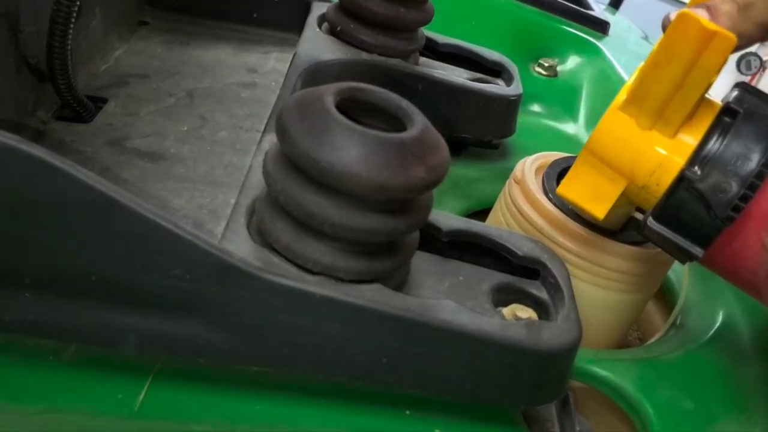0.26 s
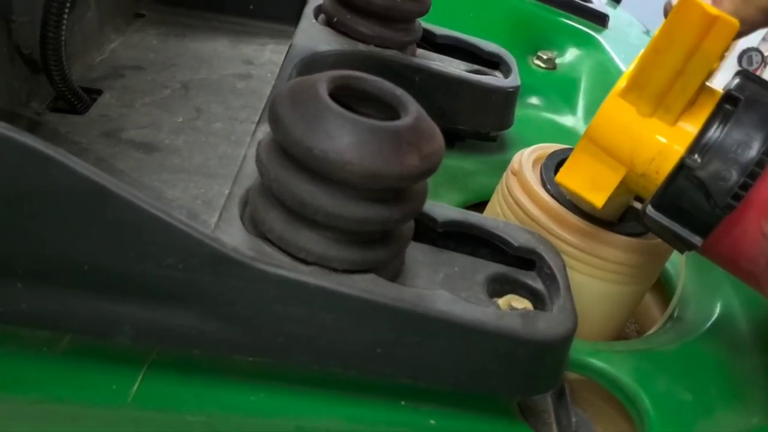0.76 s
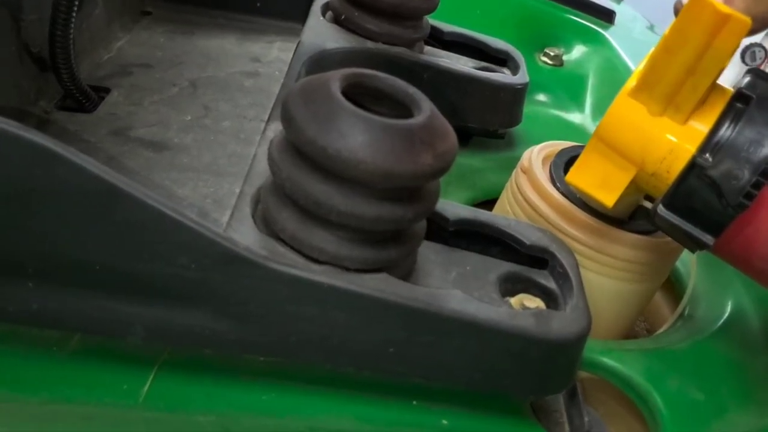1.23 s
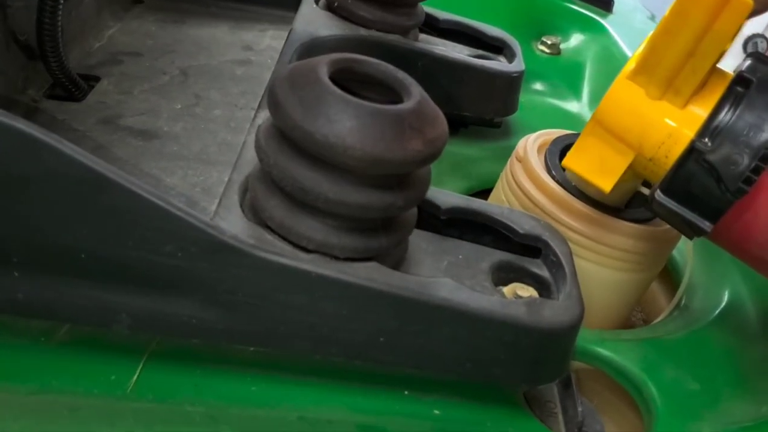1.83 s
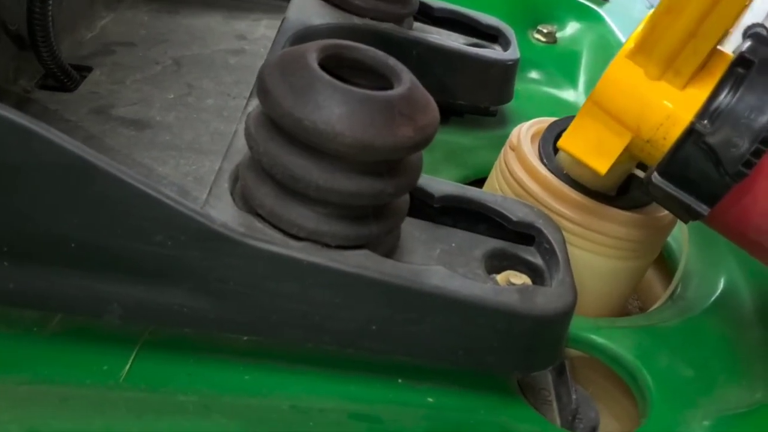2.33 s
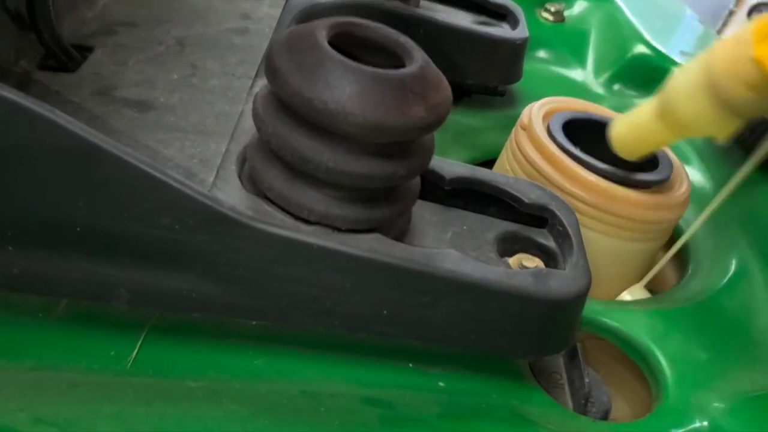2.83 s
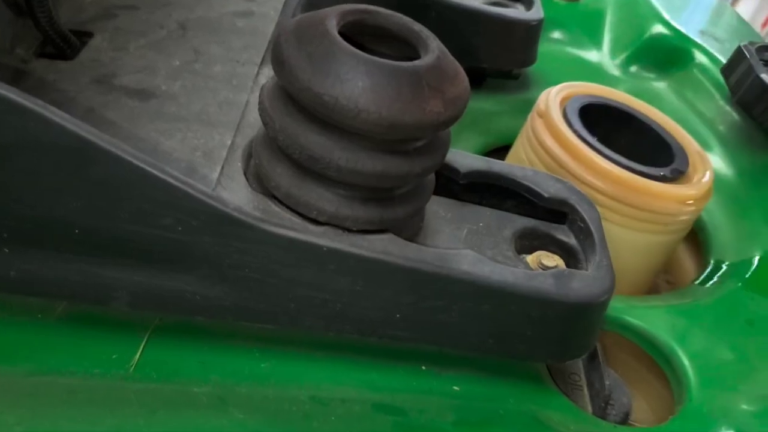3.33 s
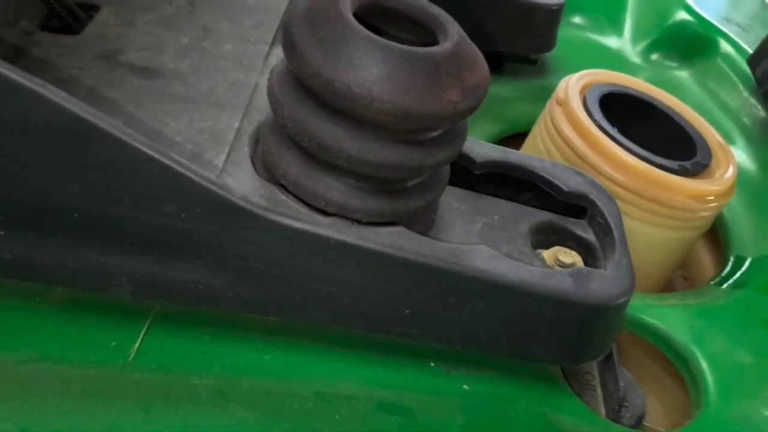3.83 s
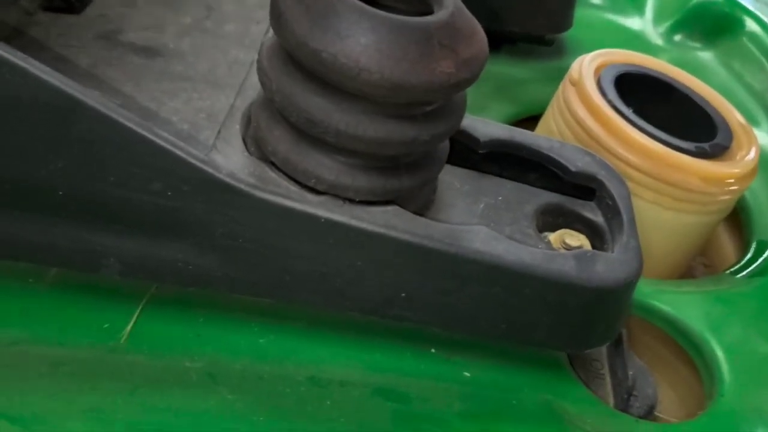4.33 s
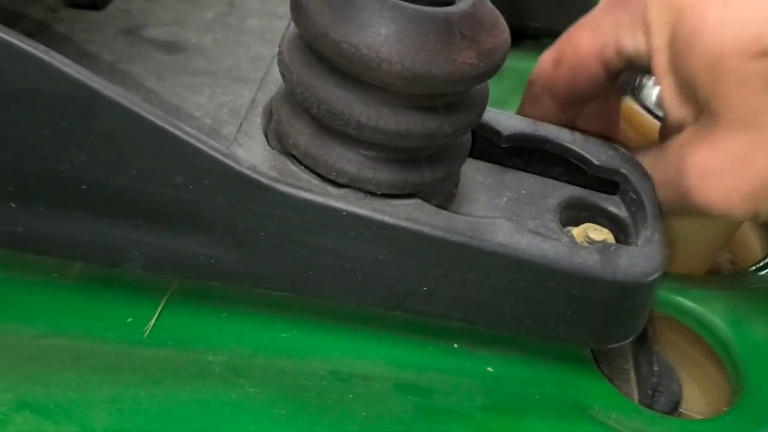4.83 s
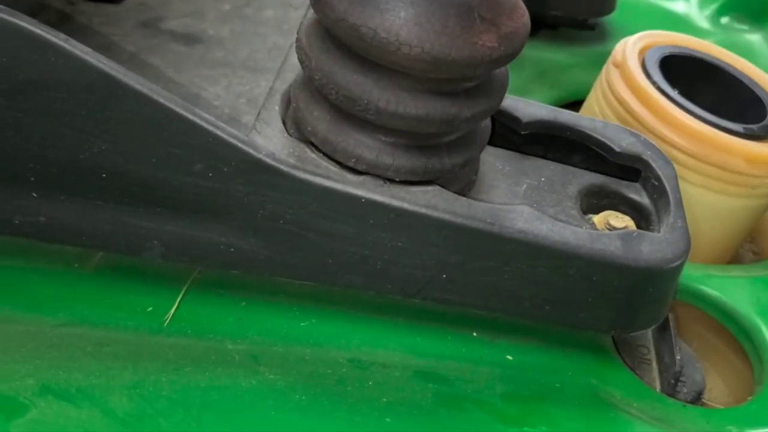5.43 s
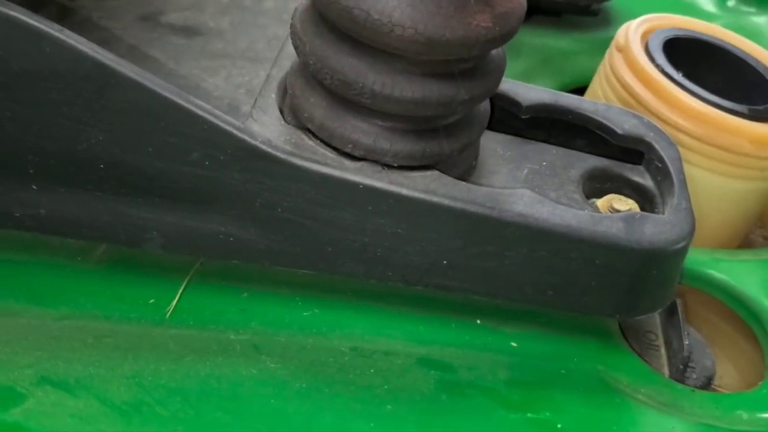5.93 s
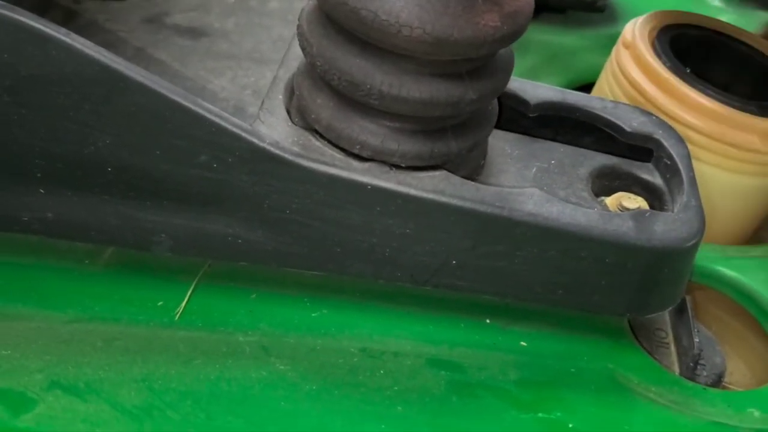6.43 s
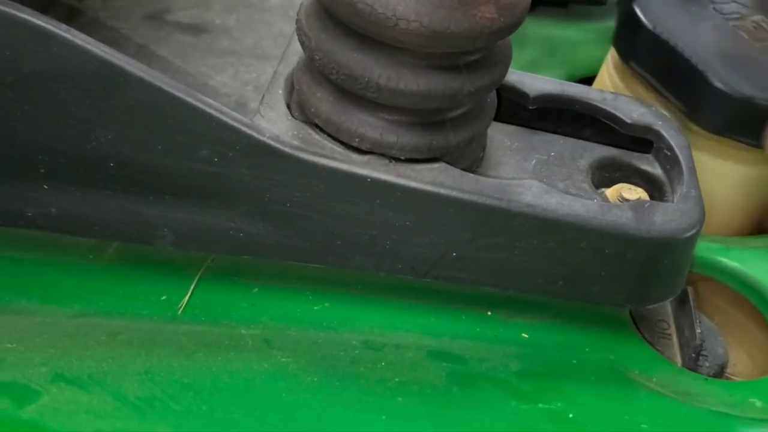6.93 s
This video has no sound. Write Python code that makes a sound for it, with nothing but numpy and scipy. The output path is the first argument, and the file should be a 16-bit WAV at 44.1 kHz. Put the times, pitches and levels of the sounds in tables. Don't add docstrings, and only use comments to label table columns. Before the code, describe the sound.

Fuel glugs and whistles softly through a spout, a valve snaps shut, a can booms down, then a plastic cap clicks and scrapes.

```python
import sys
import numpy as np
from scipy import signal
from scipy.fft import rfft, irfft, next_fast_len
from scipy.io import wavfile
from scipy.ndimage import map_coordinates

SR = 44100
rng = np.random.default_rng(int(sys.argv[2]) if len(sys.argv) > 2 else 0)


def dump_mix(stems):
    frames = np.atleast_2d(stems).T
    limited = np.clip(frames, -1, 1)
    pcm = np.round(limited * 32767).astype(np.int16)
    wavfile.write(sys.argv[1], SR, pcm)


def magnitude_from_level(level_db):
    exponent = np.asarray(level_db, float) / 20
    return 10 ** exponent


N = 316638
CLOCK = np.arange(N) / SR


def unit(x):
    return x / np.sqrt(np.mean(x ** 2) + 1e-20)


def along(points, hz):
    f, v = np.transpose(points)
    return np.interp(np.log(hz + 1), np.log(f + 1), v)


def wobble(rate):
    knots = rng.standard_normal(int(N * rate / SR) + 4)
    return map_coordinates(knots, [CLOCK * rate])


def filtered(x, response):
    n = x.shape[-1]
    m = next_fast_len(n + 4096, real=True)
    hz = np.fft.rfftfreq(m, 1 / SR)
    return irfft(rfft(x, m) * response(hz), m)[..., :n]


def peak(f, centre_hz, width_hz):
    return 1j * f * width_hz / (centre_hz ** 2 - f * f + 1j * f * width_hz)


def treble(f):
    return peak(f, 6060, 3500) ** 2 + 0.87 * peak(f, 12200, 8200) ** 2 / (1 + (f / 15700) ** 40)


def add(track, s, sound):
    part = track[..., round(s * SR):][..., :sound.shape[-1]]
    part += sound[..., :part.shape[-1]]


def spread(pair, alike, response=lambda hz: 1):
    def mix(hz):
        turn = np.arccos(np.clip(along(alike, hz), -1, 1)) / 2
        return response(hz) * np.array([np.cos(turn), np.sin(turn)])
    mid, side = filtered(pair, mix)
    return np.array([mid + side, mid - side])


def rush(colour, alike):
    noise = rng.standard_normal((2, N))
    return unit(spread(noise, alike, lambda f: magnitude_from_level(along(colour, f))))


def ports(x, lag_s):
    return filtered(x, lambda f: np.exp(-1j * np.pi * f * lag_s * np.array([[1], [-1]])))


# pitch in Hz, likeness from -1 to 1.
ALIKE = [(60, 1), (130, 0.92), (290, 0.74), (640, 0.01), (1410, -0.047), (3100, 0.053), (6820, -0.42),
         (15000, -0.48)]


def dying(seconds, t60s):
    hz, t, z = signal.stft(rng.standard_normal((2, round(seconds * SR))), SR, nperseg=512)
    fade = magnitude_from_level(-60 * t / along(t60s, hz)[:, None])
    return spread(signal.istft(z * fade, SR, nperseg=512)[1], ALIKE)


# pitch in Hz, level in dB per Hz.
SHOP = [(22, -12), (96, 1), (160, -16), (281, -3.5), (480, -15), (800, -24), (2200, -25), (3940, -37),
        (16000, -57)]


def shop_air():
    return magnitude_from_level(-50 + 1.9 * wobble(9.9)) * rush(SHOP, ALIKE)


# pitch in Hz, level in dB per Hz.
CHASSIS = [(20, -25), (40, -13), (80, 11), (120, -0.5), (200, -26.5), (400, -120)]
# start in seconds, level in dB.
ROCKS = [
    (2.339, -37),
    (3.1, -35),
    (3.96, -27.5),
    (6.55, -38.5),
]


def chassis_rocking():
    rise_s, t60_s = 0.041, 1.7
    rock = np.zeros(N)
    for s, db in ROCKS:
        age = CLOCK - s
        rock += magnitude_from_level(db - 60 * age / t60_s) * np.clip(age / rise_s, 0, 1)
    return magnitude_from_level(-4.5) * rock * rush(CHASSIS, ALIKE) * magnitude_from_level([[-.7], [.7]])


# pitch in Hz, time to fall 60 dB in seconds.
WALLS = [(100, 0.34), (1000, 0.21), (10000, 0.11)]


def walls(x):
    tail = dying(0.43, WALLS)
    delayed = np.pad(x, (400, 0))[None]
    return signal.fftconvolve(delayed, tail / np.linalg.norm(tail[0]), axes=1)[:, :N]


# pitch in Hz, level in dB per Hz.
BOOM = [(20, -12.5), (70, 2), (167, -6), (208, 0.5), (368, -7), (500, -8), (7510, -35.5), (16000, -75)]
# pitch in Hz, time to fall 60 dB in seconds.
BOOM_T60 = [(40, 1.44), (100, 1.35), (250, 0.68), (1000, 0.68), (4000, 0.42), (12000, 0.28)]


def boom():
    track = np.zeros((2, N))
    roll = unit(filtered(dying(1.2, BOOM_T60), lambda f: magnitude_from_level(along(BOOM, f))))
    t = np.arange(roll.shape[1]) / SR
    low = filtered(roll, lambda f: 1 / (1 + (f / 1500) ** 4))
    thud = low * (1 - np.exp(-t / 0.00068))
    slosh = (roll - low) * (1 - .9 * np.exp(-(t / .055) ** 2))
    add(track, 3.968, magnitude_from_level(-24) * (thud + magnitude_from_level(8) * slosh))
    return track


# start in seconds, peak level in dB, pitch in Hz,
# time to fall 60 dB in seconds, level of the shell ring in dB.
KNOCKS = [(2.362, -10, 106, 0.14, -1.5), (2.577, -33, 280, .12, -12), (2.598, -33, 100, .12, -20),
          (2.759, -28.5, 303, 0.22, -1.5), (2.765, -33, 95, .25, -20), (2.921, -29, 108, 0.2, 5.5),
          (2.996, -20, 345, 0.2, -1.5), (3.03, -27, 100, .3, -15), (3.085, -30, 350, .12, -5),
          (3.191, -15, 300, 0.3, 2), (3.215, -24.5, 132.8, 0.38, -8), (3.471, -38, 81.7, 0.31, 9.5),
          (3.971, -13, 250, 0.14, 0), (4.739, -36, 197, 0.41, 11), (4.968, -30.5, 422, 0.38, 13.5),
          (5.008, -30, 364, 0.33, 13.5), (5.943, -36, 314, 0.15, 5), (6.413, -23, 400, 0.26, 5),
          (6.548, -21.5, 303, 0.14, 6), (6.567, -15, 240, 0.079, -37), (6.66, -26.5, 125, 0.38, -15),
          (6.878, -30, 247, 0.071, 0), (6.977, -20.5, 256, 0.082, 0.5), (6.985, -30, 100, .3, -20),
          (7.139, -28, 180, 0.14, -25)]


def hollow_thumps():
    track, t = np.zeros(N), np.arange(SR // 3) / SR
    for s, db, hz, t60, shell_db in KNOCKS:
        burst = rng.standard_normal(len(t)) * magnitude_from_level(-60 * t / t60) * (1 - np.exp(-t / 0.0018))
        low = filtered(burst, lambda f: peak(f, hz, hz / 3) + .4 * peak(f, 220, 300) ** 2)
        shell = filtered(burst * magnitude_from_level(-60 * t / 0.037), lambda f: peak(f, 815, 700) ** 2)
        both = low / abs(low).max() + magnitude_from_level(shell_db) * shell / abs(shell).max()
        add(track, s, magnitude_from_level(db + 2) * both)
    return track


# start in seconds, level in dB, pitch in Hz, time to fall 60 dB in seconds.
RINGS = [(2.385, -29, 535, 0.4), (2.366, -11, 140, 0.25), (2.372, -17, 228, 0.3), (2.998, -16, 370, 0.15),
         (3.028, -19, 345, .15), (3.0, -24, 830, .12), (2.362, -20, 760, .06), (2.805, -38, 835, .12),
         (2.925, -30, 100, .2), (4.035, -22, 362, .15), (4.02, -21, 205, .2), (4.04, -30, 535, .2),
         (3.195, -19, 245, .12), (3.235, -23, 345, .2), (5.96, -46, 318, .4), (6.425, -26, 310, .25),
         (3.972, -11, 257, .2), (3.972, -18, 190, .15), (3.214, -24, 42, 0.35), (3.976, -22, 75.2, 1.6),
         (3.974, -30, 62, 1.2), (3.978, -28, 90.8, .8), (6.085, -39.5, 320, 0.55), (6.06, -46, 530, .2),
         (6.568, -19, 115.4, 0.24), (6.57, -22, 255, .15), (6.98, -30, 105, .3)]


def ringing_panels():
    track, t = np.zeros(N), np.arange(SR) / SR
    wander = wobble(25)
    rise_cycles, blur = 3.5, .25
    for s, db, hz, t60 in RINGS:
        waver = blur * hz / 300 * np.roll(wander, round(hz) * 100)[:SR]
        swell = 1 - np.exp(-t * hz / rise_cycles)
        add(track, s, magnitude_from_level(db - 60 * t / t60) * swell * np.sin(2 * np.pi * hz * t + waver))
    return track


def rubbing(table, width, broad, rise_s, order, modes):
    body, edge = np.zeros((2, 2, N))
    for s, t60, db, hz, treble_db in table:
        rise = min(rise_s + .06 * t60, 0.2)
        length_s = min(rise + 0.88 * t60, N / SR - s + rise)
        t = np.arange(int(length_s * SR)) / SR
        pair = rng.standard_normal((2, len(t)))
        shape = magnitude_from_level(db - 60 * np.maximum(t - rise, 0) / t60) * np.minimum(t / rise, 1) ** 0.6
        rub = filtered(pair, lambda f: peak(f, hz, width * hz) ** order + broad * peak(f, 2300, 4100) ** 2)
        add(body, s - rise, shape * unit(rub))
        add(edge, s - rise, shape * magnitude_from_level(treble_db + 2.5) * pair)

    def comb(f):
        return 1 + 2.0 * sum(magnitude_from_level(g) * peak(f, c, w) for c, w, g in modes)
    grit = magnitude_from_level(2.2 * wobble(300) + 1.8 * wobble(67))
    dull = spread(body, ALIKE, comb) * magnitude_from_level(-3.5 if modes else 0)
    return (dull + spread(edge, ALIKE, treble)) * unit(grit)


# peak time in seconds, time to fall 60 dB in seconds,
# level in dB, pitch in Hz.
CHIMES = [(2.364, 0.04, -16, 1140), (2.995, 0.03, -15.5, 3280), (2.997, 0.026, -33, 4760),
          (4.44, 0.14, -57, 7050), (4.778, .07, -37.5, 6030), (6.227, 0.42, -57, 2960),
          (4.969, 0.045, -22, 6160), (5.116, 0.3, -40, 3080), (5.12, 0.37, -48, 5180),
          (5.165, .03, -19, 4700), (5.832, .12, -30, 1740), (5.83, 0.045, -23.5, 4700),
          (5.84, .4, -47, 4900), (5.945, 0.22, -47, 4930), (6.232, 0.14, -57, 5000), (6.54, 0.3, -37, 5100),
          (6.979, 0.11, -37, 820)]


def chimes():
    rows = [(*row, -37) for row in CHIMES]
    return rubbing(rows, width=.12, broad=.01, rise_s=.0015, order=2, modes=[])


# peak time in seconds, time to fall 60 dB in seconds, level in dB,
# pitch in Hz, treble level in dB.
SPOUT_STROKES = [(2.359, 0.054, -25, 1110, -31.5), (2.72, 1.5, -54, 2500, -5), (3.0, 1.45, -47.5, 2980, -8),
                 (3.207, 0.17, -18, 2280, -20), (3.281, 0.71, -42, 2150, -23), (3.48, 0.19, -57, 948, -2.5),
                 (3.966, 0.13, -34.5, 1200, -31), (4.045, 0.48, -44.5, 6360, -10.5)]
# peak time in seconds, time to fall 60 dB in seconds,
# level in dB, pitch in Hz, treble level in dB.
CAP_STROKES = [(4.745, .25, -51.5, 766, -22), (4.782, 0.09, -32, 2930, -12), (4.809, .25, -36, 2170, -27),
               (4.98, 0.08, -21.5, 2750, -18.5), (5.035, 0.4, -27, 1900, -25),
               (5.124, 0.45, -48.5, 3040, -18), (5.176, 0.06, -26.5, 3380, -16.5),
               (5.236, 0.14, -27, 3330, -38), (5.262, 0.12, -33, 860, -20), (5.225, .15, -40, 850, -30),
               (5.195, .2, -42, 2000, -20), (5.09, .3, -42, 880, -30), (5.85, 0.4, -41, 1900, -8),
               (5.949, 0.48, -41, 2040, -23), (6.232, .15, -46, 1500, -12), (6.26, .6, -42, 750, -19),
               (6.075, .3, -48, 650, -35), (6.32, .3, -50, 2600, -15), (6.72, .15, -45, 850, -20),
               (6.43, 0.25, -21, 1900, -17), (6.44, .22, -22, 1050, -30), (4.955, .2, -40, 1800, -35),
               (4.81, .3, -41, 1200, -30), (6.39, 0.2, -43.5, 3010, -2.5), (6.563, 0.049, -35, 1200, -5),
               (6.701, 0.34, -45.5, 1020, -15), (6.88, 0.08, -51, 1500, -25), (6.993, 0.14, -42, 1230, -21),
               (7.05, 2, -51, 1350, 2), (5.99, 27, -68, 4900, -8)]
# pitch in Hz, width in Hz, level in dB.
CAP = [(840, 110, -2), (1780, 70, -2), (2280, 60, -3), (2600, 80, -6), (3050, 140, -3), (3580, 90, -2),
       (3910, 170, -6), (4480, 130, -6), (5050, 130, -5), (5910, 130, -12), (6500, 80, -12)]


def strokes():
    return rubbing(SPOUT_STROKES + CAP_STROKES, width=0.33, broad=0.35, rise_s=.009, order=1, modes=CAP)


def clicks(table, sharp, tail_db):
    track, t = np.zeros(N), np.arange(SR // 12) / SR
    for s, db, hz, treble_db, t60 in table:
        noise = rng.standard_normal(len(t)) * (1 - np.exp(-t / 0.001))
        snap = 5 * np.exp(-((t - .0004) / .00004) ** 2)
        crack = 0.92 * noise * magnitude_from_level(-60 * t / 0.013) + snap
        rattle = noise * magnitude_from_level(tail_db - 60 * t / t60)
        body = filtered(crack, lambda f: peak(f, hz, hz / sharp) + 0.066 * peak(f, 2000, 4200))
        body += filtered(rattle, lambda f: 1.1 * peak(f, hz, hz / 3.55) ** 2)
        edge = filtered(crack + rattle, treble)
        both = body / abs(body).max() + magnitude_from_level(treble_db + 5.5) * edge / abs(edge).max()
        add(track, s, magnitude_from_level(db + 3.5) * both)
    return track


# start in seconds, peak level in dB, pitch in Hz, treble level in dB.
SPOUT_TICKS = [(2.3425, -30.5, 2140, -25), (2.3602, -19.5, 1500, 7.5), (2.3636, -14, 1150, -6),
               (2.743, -31, 3040, -19.5), (2.759, -33, 5730, 4), (2.8377, -31.5, 6330, -12),
               (2.8532, -32.5, 2640, -9.5), (2.855, -40, 1150, -30), (2.805, -40, 840, -30),
               (2.921, -28, 3300, -17.5), (2.922, -32, 980, -30), (2.9941, -12, 3196, -27.5),
               (3.019, -23, 3460, -5), (3.088, -40, 3320, -17), (3.183, -32, 2500, -8),
               (3.1903, -12.5, 3100, -2), (3.1969, 0, 2150, -29.5), (3.212, -15, 1980, -38),
               (3.243, -18.5, 2100, -31), (3.301, -26, 2360, -36), (3.469, -41.5, 1210, -21),
               (3.948, -29, 1210, -40)]
# start in seconds, peak level in dB, pitch in Hz, treble level in dB.
CAP_TICKS = [(4.7367, -50, 2390, -24), (4.774, -39.5, 3080, -19.5), (4.8044, -16.5, 2690, -30),
             (4.9432, -30, 2000, -40), (4.9679, -10.5, 2780, -30.5), (5.009, -15.5, 2980, -26),
             (5.1053, -38, 2950, -22.5), (5.1641, -16, 3260, -25), (5.214, -26, 3150, -35),
             (5.2358, -27, 3760, -25), (5.255, -32, 2450, -25), (5.012, -28, 4700, -25),
             (5.095, -35, 3100, -25), (5.035, -27, 2900, -30), (5.067, -30, 2300, -30),
             (5.8295, -17, 1600, -12), (5.828, -23, 2600, -30), (5.9414, -26, 2700, -25),
             (5.943, -31, 1130, -35), (5.945, -24, 2100, -35), (6.101, -49, 6000, -5),
             (6.223, -36, 5230, -27.5), (6.4156, -7, 1800, -14), (6.5284, -33, 5170, -8),
             (6.548, -11.5, 1800, -34.5), (6.6813, -38, 1550, -23), (6.775, -44, 2930, -3.5),
             (6.8728, -31, 1570, -30), (6.977, -18, 1235, -18), (6.978, -21, 780, -35),
             (6.9785, -23, 2450, -25), (6.976, -25, 1800, -30), (7.1417, -53, 2800, -9)]


def contacts():
    rows = [(*row, .019) for row in SPOUT_TICKS]
    rows += [(*row, .055) for row in CAP_TICKS]
    return clicks(rows, sharp=12, tail_db=-3.0)


# pitch in Hz, width in Hz, level in dB.
NECK = [(843.6, 22, -3), (1880, 120, -17), (2940, 45, -14), (4560, 180, -43), (5170, 36, -44),
        (7030, 360, -31)]
# start in seconds, peak level in dB.
GULPS = [(0.03, -44), (0.188, -43.5), (0.252, -55), (0.324, -45), (0.487, -44.5), (0.682, -47), (0.76, -39),
         (0.887, -38), (1.0, -41.5), (1.09, -41), (1.245, -38.5), (1.322, -43), (1.472, -42.5),
         (1.584, -39), (1.698, -44.5), (1.834, -38), (2.109, -39), (2.224, -46.5)]


def neck_whistle(flow_db):
    gulps, track = np.zeros(N), np.zeros(N)
    for s, db in GULPS:
        add(gulps, s - .006, magnitude_from_level(db + 3) * np.hanning(int(.048 * SR)))
    for k, (hz, width_hz, db) in enumerate(NECK):
        flutter = magnitude_from_level((4.5 if k else 3) * wobble(30))
        drive = magnitude_from_level(flow_db + 7) * flutter + gulps * 0.38
        tone = unit(filtered(rng.standard_normal(N), lambda f: peak(f, hz, width_hz)))
        track += magnitude_from_level(db) * np.sqrt(width_hz / 30) * drive * tone
    song = np.sin(2 * np.pi * NECK[0][0] * CLOCK + 0.98 * wobble(40))
    return track + magnitude_from_level(-4) * gulps * song


def bubbles(count, centre_hz, low_hz):
    track, draw = np.zeros(N), rng.standard_normal((count, 3))
    starts = np.linspace(0, 2.36, count) + 0.014 * draw[:, 0] ** 2
    for s, (_, b, c) in zip(starts, draw):
        hz = np.clip(centre_hz * np.exp(0.416 * b), low_hz, 2800)
        v = np.arange(int(9 * SR / hz)) * hz / (9 * SR)
        size = magnitude_from_level(3.2 * c) * np.sqrt(900 / max(hz, 900))
        swell = np.sin(np.pi * np.sqrt(v)) ** 2
        add(track, s, size * swell * np.sin(2 * np.pi * 9 * v * (1 + 0.18 * v)))
    return unit(track)


# start in seconds, peak level in dB, pitch in Hz, treble level in dB.
SPITS = [(0.171, -38, 1830, -9), (0.332, -26, 990, -24.5), (0.3927, -47.5, 2940, 6),
         (0.5147, -34.5, 2480, -33), (0.6028, -36.5, 2740, -11), (1.121, -31.5, 1680, -25),
         (1.3537, -37.5, 2940, -6.5), (1.602, -45, 1820, -0.5), (1.6832, -33, 4900, -26),
         (1.833, -28, 990, -22), (2.2285, -32, 1900, -15.5), (2.224, -33, 920, -25), (.805, -38, 1860, -25),
         (1.006, -35, 1870, -20), (.83, -38, 990, -30), (.905, -40, 2300, -10), (.415, -41, 1950, -15),
         (2.282, -27, 932, -20.5)]


def splashes():
    return clicks([(*row, .02) for row in SPITS], sharp=12.0, tail_db=4.5)


# start in seconds, peak level in dB, pitch in Hz.
GLUGS = [(0.155, -25, 265), (0.336, -32, 256), (0.45, -32.5, 174), (0.538, -31, 230), (0.607, -22.5, 271),
         (0.665, -27.5, 277), (0.766, -29.5, 278), (0.803, -29, 307), (0.963, -22.5, 293),
         (1.005, -29, 287), (1.114, -37.5, 172), (1.276, -35, 286), (1.354, -33, 189), (1.78, -36, 259),
         (1.849, -32, 273), (1.946, -33, 276), (2.105, -33.5, 292), (2.224, -32, 250), (2.284, -24, 287)]


def big_glugs():
    track, cycles = np.zeros(N), 5.64
    for s, db, hz in GLUGS:
        v = np.arange(int(cycles * SR / hz)) * hz / (cycles * SR)
        swell = np.sin(np.pi * v ** 0.76) ** 2
        tone = np.sin(2 * np.pi * cycles * v * (0.95 + 0.07 * v))
        add(track, s - .004, magnitude_from_level(db - 1.5) * swell * tone)
    return track


# pitch in Hz, level in dB per Hz.
GURGLE = [(53, -41), (90, 4.5), (299, 2.5), (346, -5.5), (387, 1), (492, -17), (910, -62), (1540, -120)]
# pitch in Hz, level in dB per Hz.
SPRAY = [(350, -21.5), (800, 1), (1400, -10), (4230, -17), (6960, -13.5), (9330, -27.5), (14900, -20.5),
         (16500, -54)]
# pitch in Hz, likeness from -1 to 1.
ALIKE_POUR = [(60, -0.49), (130, 0.82), (290, 0.76), (640, -0.75), (1410, -0.025), (3100, 0.13),
              (6820, -0.34), (15000, 1)]


def gurgle_and_spray(gurgle_db, spray_db):
    lumps = wobble(30)
    uneven = magnitude_from_level(3.2 * np.tanh(lumps / 2) * 2)
    gurgle = magnitude_from_level(gurgle_db + 1.5) * unit(uneven * rush(GURGLE, ALIKE_POUR))
    flicker = magnitude_from_level(3.3 * wobble(90) + 0.33 * lumps)
    return gurgle + magnitude_from_level(spray_db - 3.5) * unit(flicker * rush(SPRAY, ALIKE_POUR))


# time in seconds, flow in dB.
FLOW = [
    (0.0, 0.5),
    (1.2, -3),
    (2.78, -4),
]


def pour():
    flow_db = np.interp(CLOCK, *np.transpose(FLOW))
    gurgle_db, neck_db, spray_db = -44.5 + flow_db, -53.5 + 1.22 * flow_db, -46.5 + 0.16 * flow_db
    flowing = np.clip((2.95 - CLOCK) / 0.086, 0, 1)
    fizz = magnitude_from_level(spray_db - 7.5) * bubbles(count=420, centre_hz=1118, low_hz=500)
    fizz += magnitude_from_level(gurgle_db - 7) * bubbles(count=110, centre_hz=250, low_hz=150)
    whistle = neck_whistle(neck_db - 12 * (CLOCK > 2.36))
    near = ports(whistle, lag_s=0.00011) + ports(fizz + splashes(), lag_s=0.00032)
    stream = flowing * (gurgle_and_spray(gurgle_db, spray_db) + near)
    return stream + ports(big_glugs(), lag_s=0.00031)


def scene():
    ticks, thumps = contacts(), hollow_thumps() + ringing_panels()
    hands = ports(ticks, lag_s=0.0002564) * magnitude_from_level([[1.2], [-1.2]]) + magnitude_from_level(-15.5) * walls(ticks)
    hands += strokes() + chimes()
    body = ports(thumps, lag_s=0.00037) * magnitude_from_level([[-.7], [.7]]) + magnitude_from_level(-7) * walls(thumps)
    return shop_air() + chassis_rocking() + boom() + body + hands + pour()


def low_pass(x):
    return signal.sosfilt(signal.butter(12, 16810, fs=SR, output="sos"), x)


# pitch in Hz, level in dB per Hz.
HISS = [(3000, -38), (6000, -16.5), (10000, -0.5), (16000, 4)]


def record(dry):
    wet = dry + magnitude_from_level(-75.0) * rush(HISS, [(100, 0.0008)])

    def port_colour(f):
        tilt_db = np.array([[1], [-1]]) * (-0.75 + 2.2 * f / (f + 3000))
        return magnitude_from_level(tilt_db) * peak(f, 540, 22000)
    wet = filtered(wet, port_colour)
    top = .96
    rounded = wet / (1 + abs(wet / top) ** 8) ** (1 / 8)
    finished = filtered(rounded, lambda f: np.where(f < 15900, 1, magnitude_from_level(-24)))
    return low_pass(finished)


dry = scene()
out = record(dry)
dump_mix(out)
```